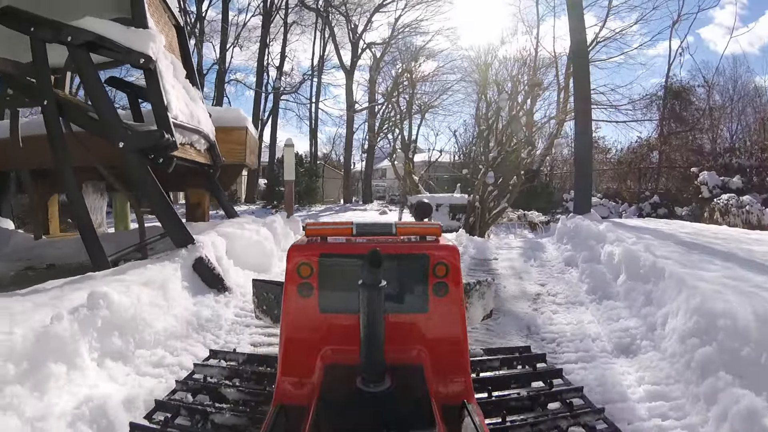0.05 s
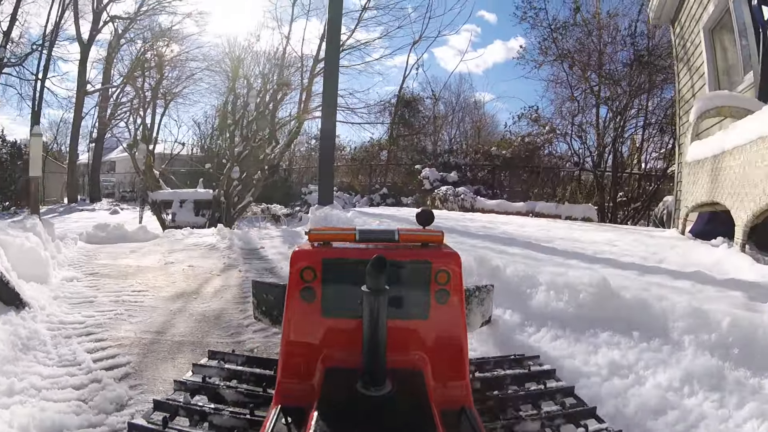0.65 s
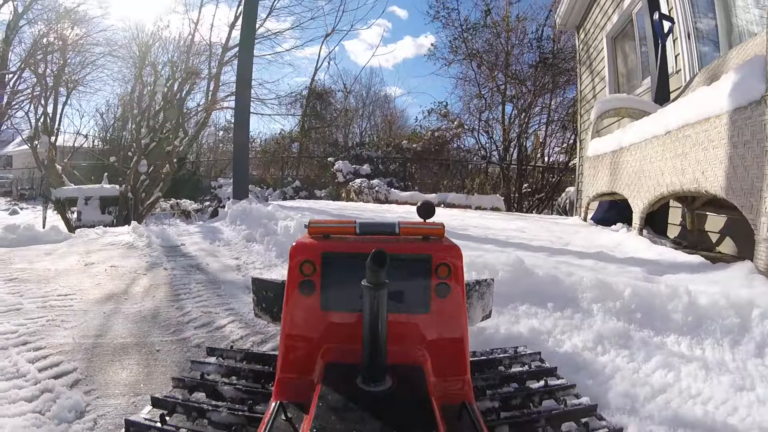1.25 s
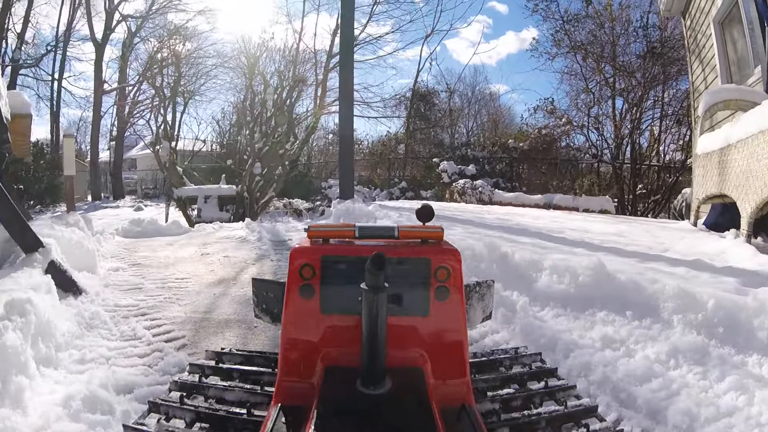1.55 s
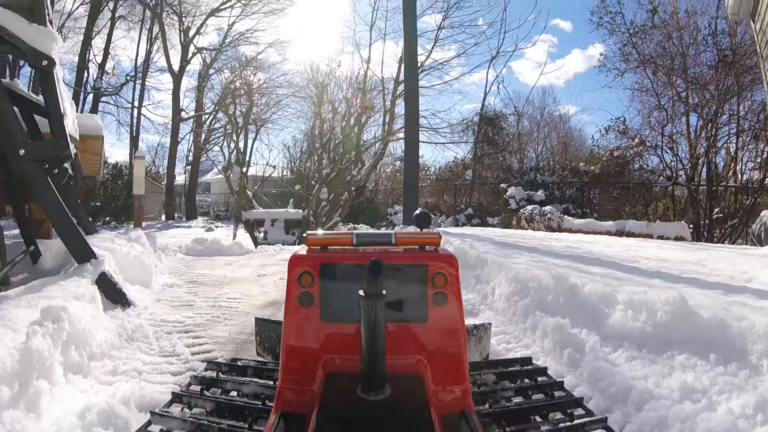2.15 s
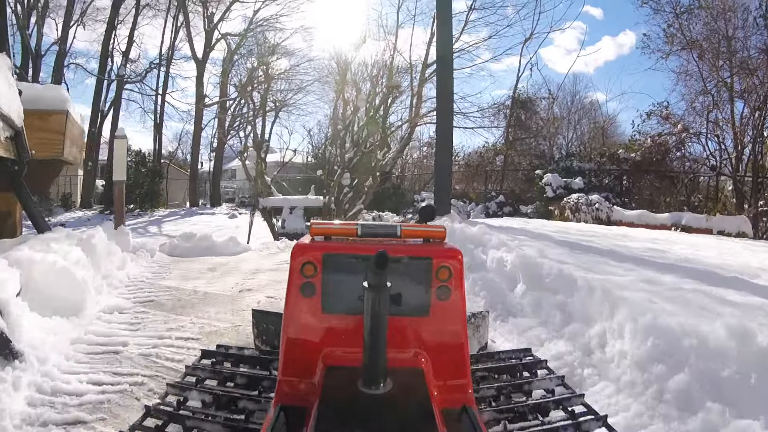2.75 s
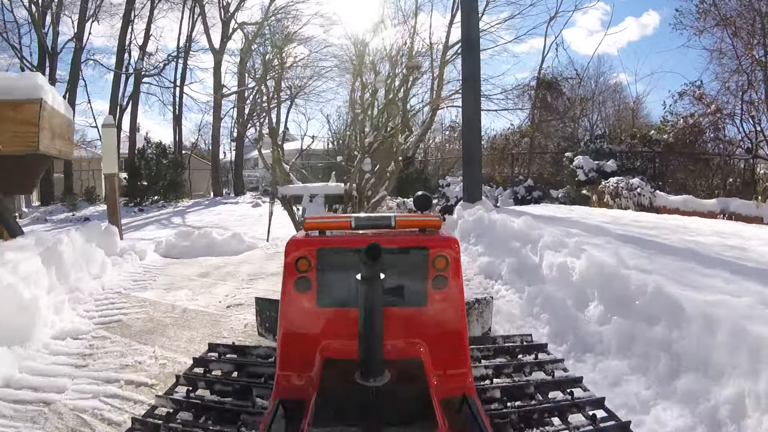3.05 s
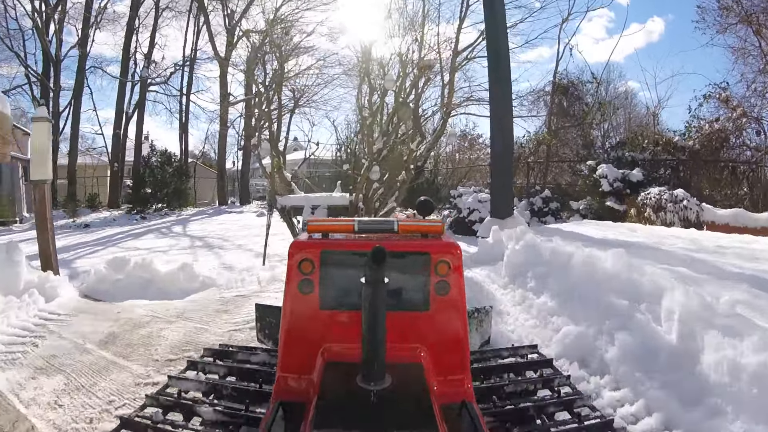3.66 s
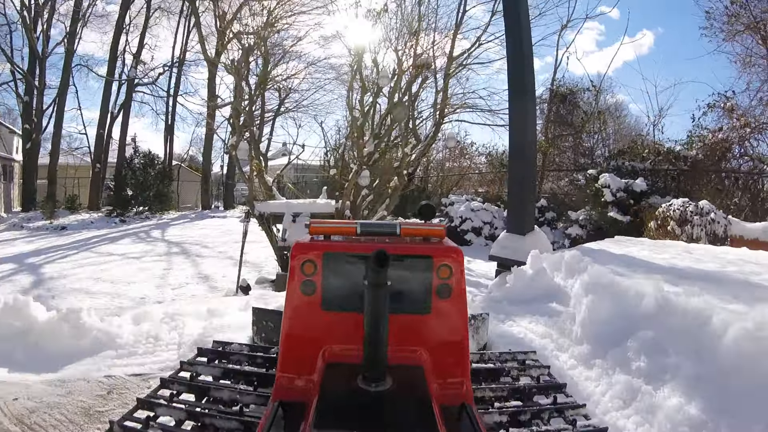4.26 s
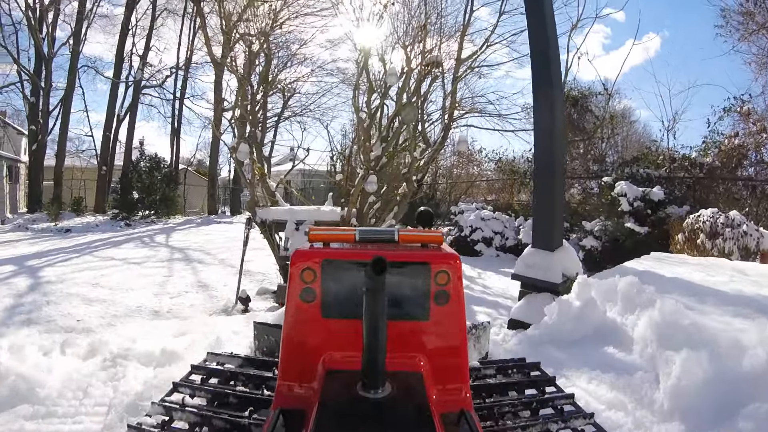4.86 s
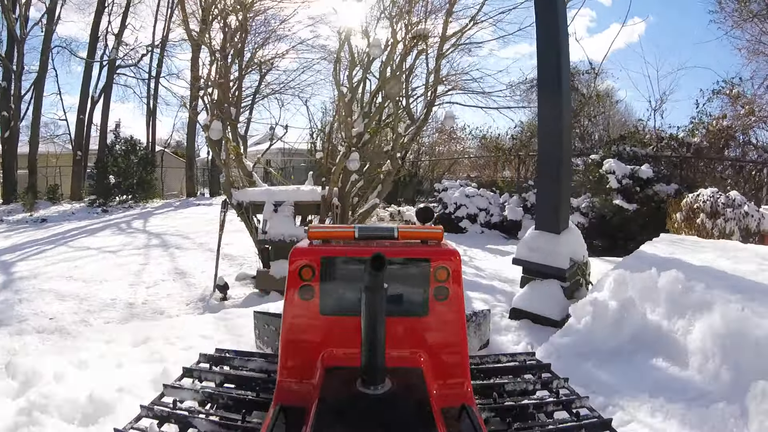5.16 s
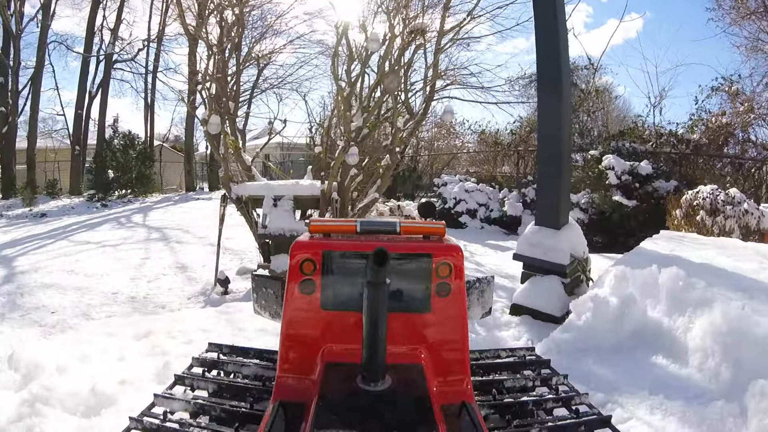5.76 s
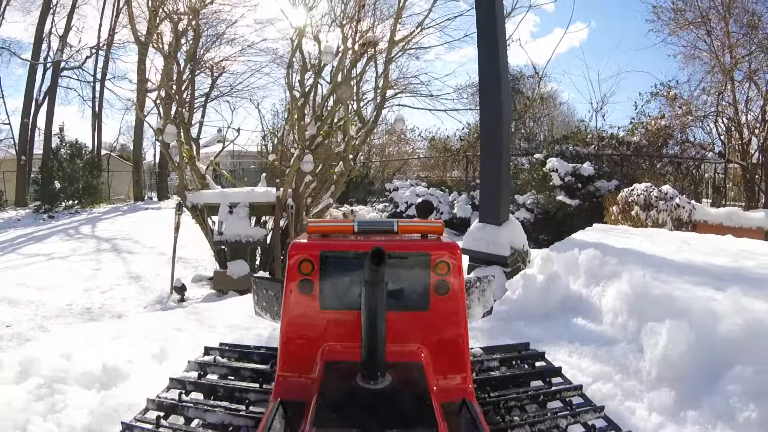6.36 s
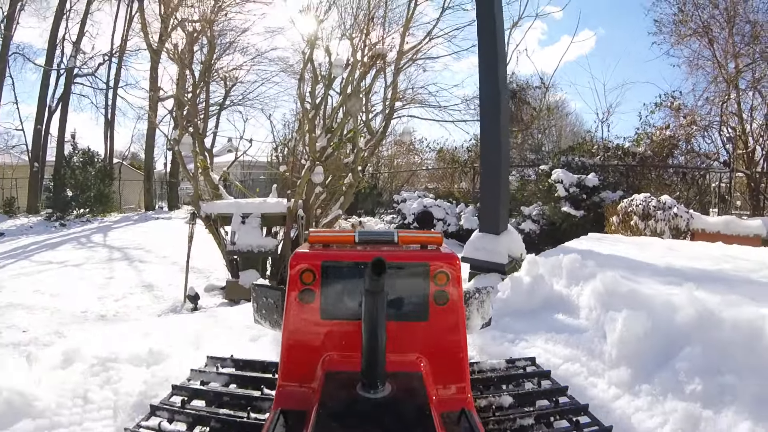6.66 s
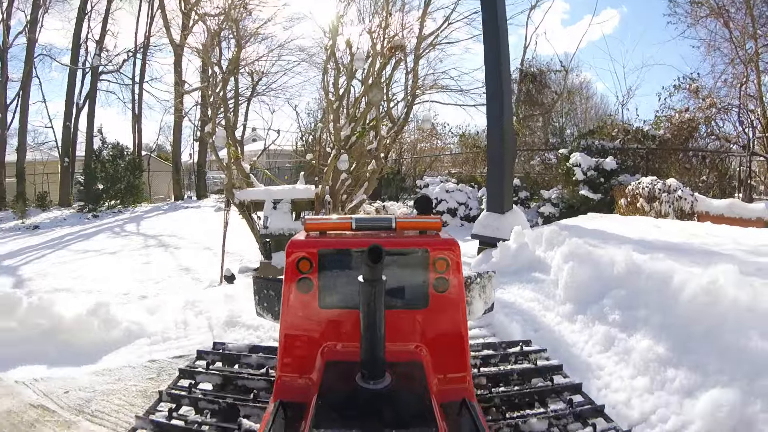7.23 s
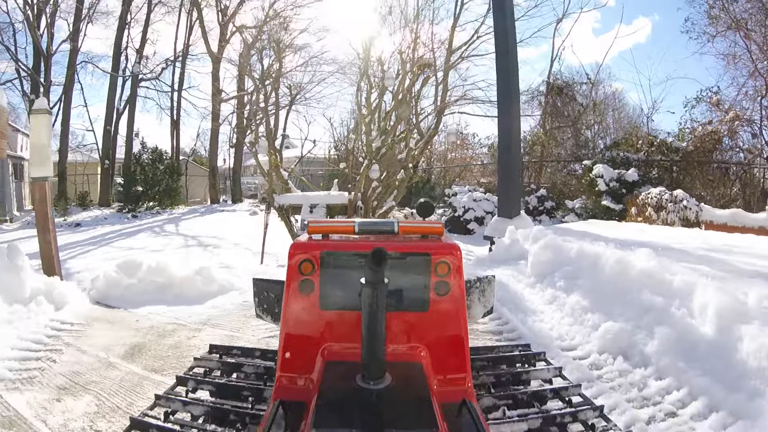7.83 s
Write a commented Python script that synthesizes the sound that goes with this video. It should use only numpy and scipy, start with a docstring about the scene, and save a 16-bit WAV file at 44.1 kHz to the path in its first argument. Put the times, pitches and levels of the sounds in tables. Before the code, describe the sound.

A small radio-controlled tracked vehicle whirs, rattles and crunches over packed snow in stop-start runs, heard up close.

```python
"""A small radio-controlled snowcat crosses packed snow, heard from a camera riding on its back.
It sets off: two geared motors whir and squeal, the tracks rattle, slap and crunch, the body rocks.
It coasts to a stop; the controller whines in the stalled motors until they spin up for a long run.
It stops again, its shell humming as the tracks slow, inches about, then backs away ever faster."""
import sys
import numpy as np
from scipy import signal
from scipy.fft import rfft, irfft, next_fast_len
from scipy.io import wavfile
from scipy.ndimage import uniform_filter1d, map_coordinates

SR = 44100
rng = np.random.default_rng(int(sys.argv[2]) if len(sys.argv) > 2 else 0)


def unload_audio(sound):
    """Save the sound as a 16-bit wav file, at the path given as the first command line argument."""
    columns = np.transpose(np.atleast_2d(sound))
    # keep every value between -1 and 1, then stretch to whole-number steps
    steps = np.round(np.clip(columns, -1, 1) * 32767)
    wavfile.write(sys.argv[1], SR, steps.astype(np.int16))


N = 352359

# pushes of the throttle: on t/s, off t/s, whir start level/dB, whir end level/dB, rattle over whir/dB
THROTTLE_PUSHES = [(-.2, 0.42, -32, -35, 6.5), (0.338, 0.906, -32.5, -33, 8.5),
                   (1.363, 1.605, -31.5, -29, 5.5), (1.724, 1.954, -31.5, -34, 4),
                   (1.907, 5.139, -32, -31.5, 8.5), (5.08, 5.245, -28.5, -41.5, 5.5),
                   (5.262, 5.342, -31, -42.5, 8), (5.756, 5.831, -34.5, -30.5, 5.5),
                   (5.951, 6.032, -28, -31.5, 3.5), (6.076, 6.3, -46, -42.5, 9), (6.285, 8, -43, -31, 7.5)]
# one track is loaded and the gears sing louder: from t/s, to t/s
LOADED_SPANS = [(0, 0.93), (6.2, 8)]
# squeals of a loaded gear: middle t/s, tooth tone f/Hz, level/dB
GEAR_SQUEALS = [(0.015, 1197, -32.5), (0.155, 1229, -32.5), (0.39, 1173, -30), (0.566, 1230, -38.5),
                (0.775, 1670, -30.5), (0.855, 1197, -37.5), (6.283, 1110, -35), (7.135, 1147, -36.5),
                (7.545, 1134, -33), (7.77, 1114, -32)]
# partials of a squeal: harmonic number, relative level/dB
SQUEAL_PARTIALS = [(1, 4.5), (2, -6), (4, -8.5)]
# partials of the controller's whine, before pulse width shapes them: harmonic number, relative level/dB
WHINE_PARTIALS = [(1, 1.5), (2, -14), (3, -3), (4, -10)]
# hard slaps of a cleat on the wheels: t/s, relative crack level/dB, relative thud level/dB, ring level/dB
CLEAT_SLAPS = [(0.0806, -11, -21, -17), (0.4316, -14, -22, -17), (0.4519, -9, -22, -21),
               (0.5124, -18, -16, -22), (0.5752, -26, -20, -33), (0.6927, -8.5, -29, -14.5),
               (0.8785, -10, -21, -11.5), (1.034, -47, -32.5, -47), (1.182, -36, -50, -60),
               (1.3895, -12, -18.5, -23), (1.846, -16, -14.5, -19.5), (1.9808, -19.5, -18, -31),
               (2.4329, -16, -16.5, -31), (2.5938, -14.5, -23.5, -33), (2.7187, -15, -19, -21),
               (2.8284, -21, -17, -32), (3.0014, -21, -27, -36), (3.7865, -16, -19.5, -24),
               (4.1779, -9, -25, -18.5), (4.3749, -19, -20, -22), (4.6047, -12, -21, -37),
               (4.6296, -17, -17.5, -31), (4.914, -22, -26, -30), (4.9672, -19, -19.5, -30),
               (5.3972, -32, -25.5, -44), (5.812, -22, -27, -36), (5.9108, -28, -41, -50),
               (5.9708, -18.5, -38, -36), (6.0088, -16.5, -24, -21), (6.1798, -16, -17.5, -35),
               (6.4227, -15, -28, -15), (6.659, -24, -24.5, -32), (6.725, -11, -24, -23),
               (6.7807, -16, -31, -20), (7.106, -18, -31, -12.5), (7.5752, -10.5, -34, -23)]
# modes of a metal cleat: f/Hz, relative level/dB, t60/s
CLEAT_MODES = [(2510, -1, 0.024), (2726, 1, 0.018), (4600, -3.5, 0.022), (5400, -15, 0.018)]
# crust gives way under a track: middle t/s, length/s, rms level/dB, boom f/Hz
CRUST_BREAKS = [(0.093, 0.052, -23.5, 397), (0.245, 0.044, -20, 222), (0.304, 0.022, -24.5, 230),
                (0.47, 0.07, -26, 380), (0.677, 0.043, -21.5, 400), (0.746, .09, -23, 400),
                (1.875, .06, -27, 1130), (2.201, 0.067, -20.5, 258), (2.736, 0.07, -22.5, 400),
                (2.877, 0.037, -18.5, 367), (3.92, 0.044, -19.5, 350), (4.442, 0.043, -23, 310),
                (4.674, 0.043, -19.5, 340), (4.939, 0.031, -21, 330), (5.248, 0.02, -31.5, 620),
                (5.375, 0.037, -32.5, 448), (5.452, .05, -42, 495), (5.542, 0.035, -46.5, 550),
                (6.147, 0.03, -20, 250), (6.794, 0.054, -24.5, 300), (7.134, .035, -25, 250)]
# the slowing tracks pass through the shell's resonance: middle t/s, level/dB
SHELL_SWELLS = [(5.272, -27.5), (5.891, -26.5)]
# the hull drops on the snow: t/s, relative level/dB
HULL_DROPS = [(1.955, -19), (2.158, -20), (2.373, -18.5), (2.566, -20), (2.767, -20), (3.115, -19.5),
              (3.298, -23), (4.438, -20), (5.529, -38), (6.15, -17.5), (7.14, -19), (7.946, -19)]
# ringing colour of the gearbox housings: f/Hz, level/dB
GEARBOX_EQ = [(500, -28.5), (950, 5.5), (1400, -3), (1650, 5.5), (1840, 4.5), (2050, -9.5), (2550, -4),
              (3500, -9.5), (4100, -5.5), (4550, 1.5), (5650, -1), (6700, -15), (8700, -18), (9800, -30),
              (10700, -51.5)]
# hollow colour of the chassis: f/Hz, level/dB
CHASSIS_EQ = [(60, -26), (170, 3.5), (280, -4.5), (450, -2), (700, -6.5), (1100, -13.5), (1800, -19),
              (2200, -20.5), (3500, -31), (5300, -25.5), (6800, -37.5), (11000, -67)]
# bright colour of a slap on the wheels: f/Hz, level/dB
SLAP_EQ = [(100, -5), (400, 3.5), (800, 7), (1700, -8), (2200, -4), (3600, -5.5), (4600, -2), (5800, -0.5),
           (6600, -17), (9500, -21.5), (12000, -65)]
# low rumble of the body on its springs: f/Hz, level/dB
ROCKING_EQ = [(10, -35), (25, 2.5), (42, 10), (65, 3), (100, -5.5), (250, -72.5)]
# hush of still winter air: f/Hz, level/dB
AIR_EQ = [(25, -11), (130, -8), (400, -17), (1200, -28), (3700, -36), (5300, -34), (6500, -42), (9500, -46),
          (11500, -71)]


def gears(whir_db):
    """A spray of tiny tooth impacts rings the gearbox housings; under load the tooth tones come through."""
    t = np.arange(N) / SR
    loaded = sum(1. * (t >= start) * (t < end) for start, end in LOADED_SPANS)
    tone_gain = amp(-3.5) * np.maximum(uniform_filter1d(loaded, size=4000), .5)
    teeth = mesh(mesh_hz=1223, lurch_hz=9.5, lurch=0.085)
    teeth += 0.5 * mesh(mesh_hz=1690, lurch_hz=11, lurch=0.07)
    chatter = unit(impacts(rate=3500, scatter_db=4.5)) * amp(2.28 * wobble(130))
    whir = unit(coloured(chatter, GEARBOX_EQ)) + tone_gain * unit(coloured(teeth, GEARBOX_EQ))
    return amp(whir_db + 0.28 * wobble(16)) * whir


def mesh(mesh_hz, lurch_hz, lurch, bite_db=2.5):
    """One gear train's rasping tooth tone swells and sags as each cleat drags on the sprocket."""
    sprocket = 2 * np.pi * np.cumsum(lurch_hz * (1 + .35 * wobble(6))) / SR
    backlash = .009 * wobble(500)
    speed = 1 + lurch * np.sin(sprocket) + .02 * wobble(7) + backlash
    phase = 2 * np.pi * np.cumsum(mesh_hz * speed) / SR
    tone = sum(amp(4 * wobble(35)) * np.sin(k * phase) / np.sqrt(k) for k in range(1, 6))
    return unit(amp(-bite_db * np.cos(sprocket)) * tone)


def squeals(length_s, sag):
    """Under load a tooth tone swells and slides down as a cleat bites."""
    out, t = np.zeros(N), np.arange(round(length_s * SR)) / SR
    jitter = lambda: unit(uniform_filter1d(rng.standard_normal(len(t)), size=70))
    for s, hz, db in GEAR_SQUEALS:
        backlash, rasp = .019 * jitter(), 1 + .4 * jitter()
        phase = 2 * np.pi * np.cumsum(hz * (1 - sag * (t / length_s - .5) + backlash)) / SR
        tone = unit(rasp * sum(amp(level) * np.sin(round(k) * phase) for k, level in SQUEAL_PARTIALS))
        add(out, s - length_s / 2, amp(db) * tone * np.sin(np.pi * t / length_s))
    return out


def throttle():
    """The throttle rides the dB levels of whir, rattle and rocking; the heavier parts settle later."""
    pushes = np.array(THROTTLE_PUSHES)
    whir_db, rattle_over_db = pushes[:, 2:4], pushes[:, 4:]
    rocking_db = -25 + 0.5 * (whir_db + 33)  # grows half a dB per dB of whir
    return (spin_and_coast(whir_db, coast_db_per_s=275, rest_db=-63.5),
            spin_and_coast(whir_db + rattle_over_db, coast_db_per_s=140, rest_db=-52.5),
            spin_and_coast(rocking_db, coast_db_per_s=68, rest_db=-41.5))


def spin_and_coast(levels_db, coast_db_per_s, rest_db, spin_up_s=0.041):
    """A driven part's envelope in dB: each push spins it up, ramps its level and lets it coast."""
    t = np.arange(N) / SR
    gain = np.zeros(N)
    for (on, off, *_), ends_db in zip(THROTTLE_PUSHES, levels_db):
        speed = 1 - np.exp(-np.maximum(t - on, 0) / spin_up_s)
        ramp = np.interp(t, [on, off], amp(ends_db))
        coast = amp(-coast_db_per_s * np.maximum(t - off, 0))
        gain = np.maximum(gain, ramp * speed ** 2 * coast)  # noise grows with the square of speed
    return 20 * np.log10(np.hypot(gain, amp(rest_db)))


def tracks(rattle_db):
    """Links rattle over the road wheels and shake the chassis, with pinging pins and sharp ticks on top."""
    decay = np.exp(-np.arange(SR // 20) / SR / 0.0071)
    contacts = impacts(rate=110, scatter_db=2.5)
    flurries = np.sqrt(np.abs(signal.fftconvolve(contacts ** 2, decay)[:N]))
    rattle = unit(coloured(flurries * rng.standard_normal(N), CHASSIS_EQ))
    chassis = unit(rattle + .95 * knocks(rate=75, centre_hz=313.8, spread=0.555, cycles=1.94))
    ticks = unit(coloured(impacts(rate=26, scatter_db=4.0), SLAP_EQ))
    pins = knocks(rate=140, centre_hz=5210, spread=0.089, cycles=12)
    return amp(rattle_db + 0.5 + wobble(22)) * (chassis + amp(-18.5) * ticks + amp(-17) * pins)


def knocks(rate, centre_hz, spread, cycles):
    """Each contact strikes a different spot: a few damped cycles at its own pitch."""
    out, t = np.zeros(N), np.arange(SR // 20) / SR
    for k, (place, pitch, size) in enumerate(rng.standard_normal((int(N / SR * rate), 3))):
        turns = centre_hz * np.exp(spread * pitch) * t
        ring = np.sin(2 * np.pi * turns) * np.exp(-turns / cycles) * (1 - np.exp(-2 * turns))
        onset_s = min((k + place / 2) / rate, (N - 1) / SR)
        add(out, onset_s, amp(7.6 * np.tanh(size / 2)) * ring)
    return unit(out)


def cleat_slaps():
    """A cleat slaps down: a crack, a thud at the pitch of the spot it strikes, and a brief metal ring."""
    out, t = np.zeros(N), np.arange(SR // 8) / SR
    peak = lambda x: x / np.abs(x).max()
    fade = lambda t60: amp(-60 * t / t60)
    for s, crack_db, thud_db, ring_db in CLEAT_SLAPS:
        thud_hz = 673 * np.exp(0.36 * rng.standard_normal())
        contact = rng.standard_normal(len(t)) * (fade(0.022) + 0.19 * fade(0.17))
        contact[0] = 5  # the first touch is the hardest
        crack = peak(coloured(contact, SLAP_EQ))
        shake = contact + 0.61 * rng.standard_normal(len(t)) * fade(0.068)
        shudder = resonance(coloured(shake, CHASSIS_EQ), thud_hz, width_hz=2000)  # well damped
        thud = peak(peak(shudder) + 0.23 * np.sin(2 * np.pi * thud_hz * t) * fade(0.029))
        ring = np.zeros(len(t))
        for hz, db, t60 in CLEAT_MODES:  # no two cleats ring quite alike
            envelope = amp(db + rng.normal(0, 2.2)) * fade(t60)
            ring += envelope * np.sin(2 * np.pi * hz * rng.normal(1, 0.042) * t)
        add(out, s, amp(crack_db - 1) * crack + amp(thud_db + 6) * thud + amp(ring_db) * peak(ring))
    return out


def crunches(relative_width):
    """Crust gives way: a quick run of cracks swells, fades and booms in one hollow of the chassis."""
    out = np.zeros(N)
    cracks = coloured(impacts(rate=640, scatter_db=2.5), CHASSIS_EQ)
    for s, length, db, hz in CRUST_BREAKS:
        span = np.arange(round((s - length / 2) * SR), round((s + length / 2) * SR))
        boom = resonance(cracks[span], hz, relative_width * hz) * np.sqrt(np.hanning(len(span)))
        add(out, s - length / 2, amp(db) * unit(boom))
    return out


def body(rocking_db, rattle_db, shell_hz=124):
    """The body rocks on its springs, and its shell hums when the tracks shake it."""
    rocking = unit(amp(1.96 * wobble(20)) * coloured(rng.standard_normal(N), ROCKING_EQ))
    shell = amp(0.66 * rattle_db - 14.5) * noise_band(shell_hz, widths_hz=(19.5, 32))
    t = np.arange(SR // 6) / SR
    swell = np.hanning(len(t)) * np.sin(2 * np.pi * shell_hz * t)
    for s, db in SHELL_SWELLS:
        add(shell, s - t[-1] / 2, amp(db) * swell)
    return amp(rocking_db - 0.5) * rocking + shell


def hull_bumps(swing_hz=43, t60=0.14):
    """A drop on the snow sets the hull swinging for a cycle or two."""
    out, t = np.zeros(N), np.arange(SR // 4) / SR
    for s, db in HULL_DROPS:
        add(out, s, amp(db + 10 - 60 * t / t60) * np.sin(2 * np.pi * swing_hz * t))
    return out


def controller(chop_hz, stall_s, restart_s, attack_s=0.013, fade_db_per_s=34):
    """Chopped current sings in both stalled motors, slightly out of tune, until they start to turn."""
    t = np.arange(N) / SR
    duty = np.interp(t, [stall_s, restart_s], [0.21, 0.36])  # widening pulses thin the third harmonic
    phases = [2 * np.pi * chop_hz * detune * t + .3 * wobble(57) for detune in (1, .99)]
    motors = np.zeros((2, N))
    for motor, phase in zip(motors, phases):
        for k, db in WHINE_PARTIALS:
            pulse_weight = np.sin(np.pi * round(k) * duty)
            motor += amp(db + 2.5 * wobble(120)) * pulse_weight * np.sin(round(k) * phase)
    age = np.maximum(t - stall_s, 0)
    envelope = amp(-44.5 - fade_db_per_s * age) * (1 - np.exp(-age / attack_s)) * (t < restart_s)
    buzz = noise_band(1900, widths_hz=(1200, 1200)) * amp(3 * wobble(39))  # gears tremble in their backlash
    shiver = noise_band(chop_hz, widths_hz=(170, 170))  # rotors shiver at the chopping rate
    return envelope * (unit(motors[0] + .5 * motors[1]) + .5 * shiver + amp(-10) * buzz)


def winter_air():
    """Still air lays a faint, steady bed under the vehicle."""
    return amp(-51) * unit(coloured(rng.standard_normal(N), AIR_EQ))


def amp(db):
    return 10 ** (np.asarray(db) / 20)


def unit(x):
    return x / np.sqrt(np.mean(x ** 2) + 1e-20)


def wobble(rate):
    """A smooth random curve, rate knots a second."""
    return map_coordinates(rng.standard_normal(int(N * rate / SR) + 4), [np.arange(N) * rate / SR])


def coloured(x, eq, size=8192):
    """x through a minimum-phase EQ drawn from (f/Hz, level/dB) points."""
    hz, db = np.transpose(eq)
    gain = amp(np.interp(np.log(np.fft.rfftfreq(size, 1 / SR) + 1), np.log(hz), db))
    cepstrum = irfft(np.log(gain))
    cepstrum[1:size // 2] *= 2
    cepstrum[size // 2 + 1:] = 0
    return signal.fftconvolve(x, irfft(np.exp(rfft(cepstrum))))[:len(x)]


def resonance(x, hz, width_hz):
    """x through one mode."""
    return signal.lfilter(*signal.iirpeak(hz, hz / width_hz, SR), x)


def noise_band(hz, widths_hz):
    """Pitched noise: two resonances in series on one frequency."""
    return unit(resonance(resonance(rng.standard_normal(N), hz, widths_hz[0]), hz, widths_hz[1]))


def impacts(rate, scatter_db):
    """Blows at uneven intervals, rate a second, of scattered size and either sign."""
    count = int(N / SR * rate)
    place, size, sign = rng.standard_normal((count, 3)).T
    when = np.round((np.arange(count) + place / 2) * SR / rate).astype(int) % N
    return np.bincount(when, np.sign(sign) * amp(scatter_db * 2 * np.tanh(size / 2)), N)


def add(track, s, sound):
    """Mix a sound in at s seconds."""
    start = max(round(s * SR), 0)
    track[start:start + len(sound)] += sound[:N - start]


def scene():
    """Drive, running gear and body, mixed in mono over still winter air."""
    whir_db, rattle_db, rocking_db = throttle()
    drive = gears(whir_db) + squeals(length_s=.065, sag=0.1725)
    drive += controller(chop_hz=1094, stall_s=1.252, restart_s=1.389)
    running_gear = tracks(rattle_db) + cleat_slaps() + crunches(relative_width=1.2)
    air = winter_air()
    return (drive + running_gear + body(rocking_db, rattle_db) + hull_bumps() + air)[None]


def record(dry):
    """The camera's band limit cuts off the top of the treble."""
    top_hz = 11400
    size = next_fast_len(N + SR // 2)
    return irfft(rfft(dry, size) * (np.fft.rfftfreq(size, 1 / SR) < top_hz), size)[:, :N]


dry = scene()
out = record(dry)
unload_audio(out)
```